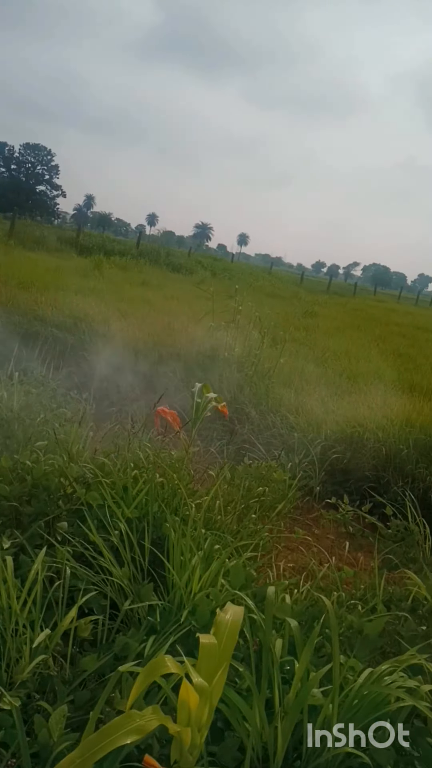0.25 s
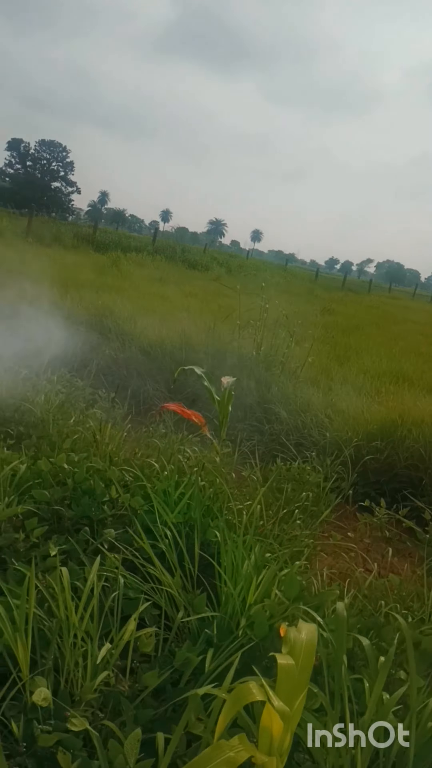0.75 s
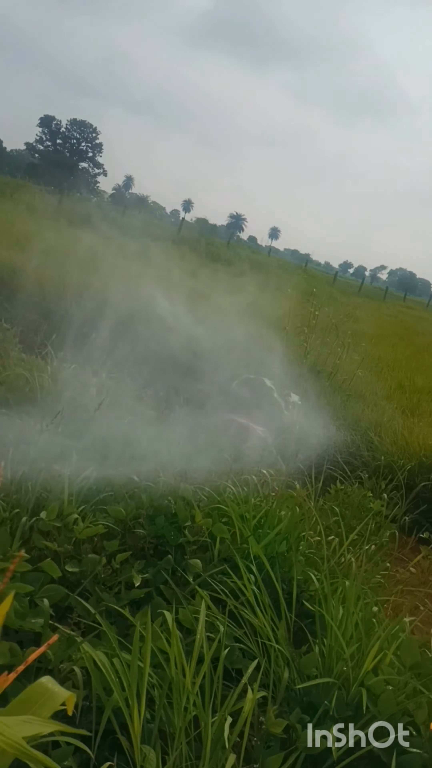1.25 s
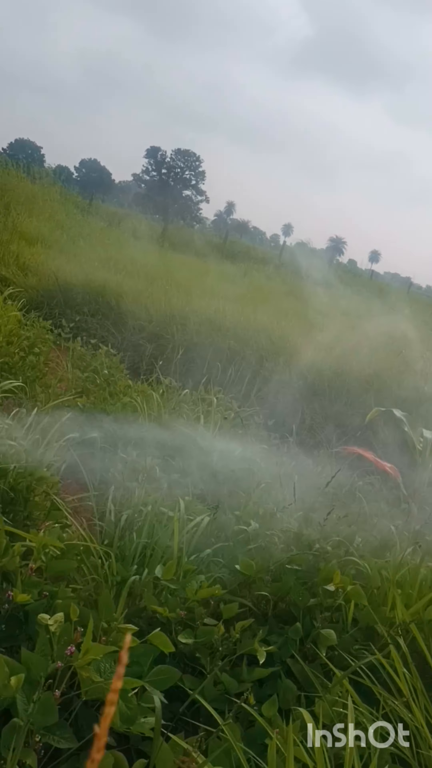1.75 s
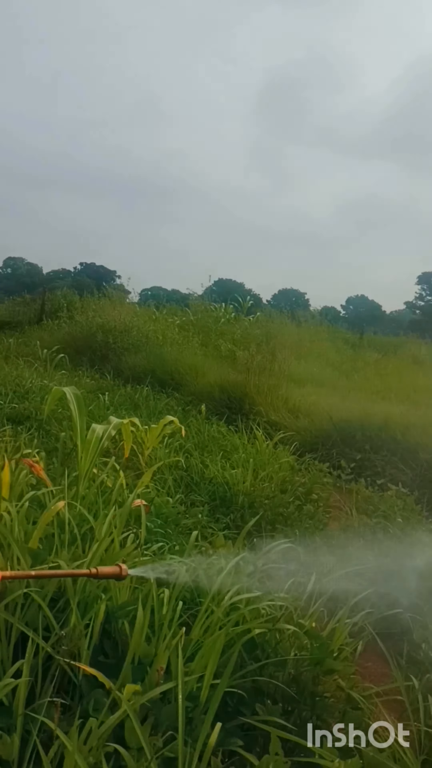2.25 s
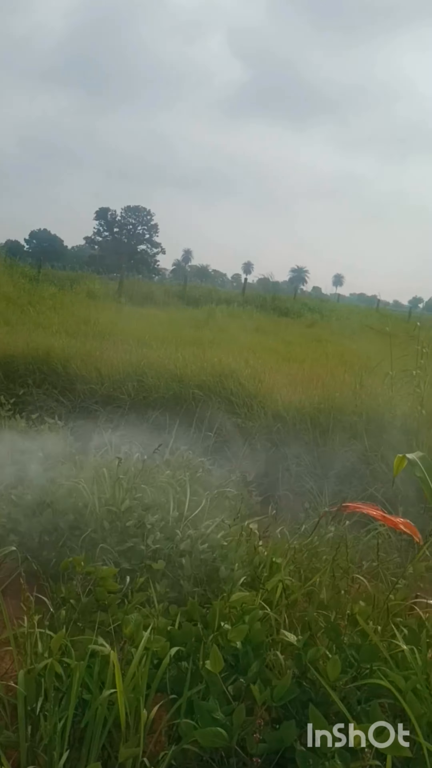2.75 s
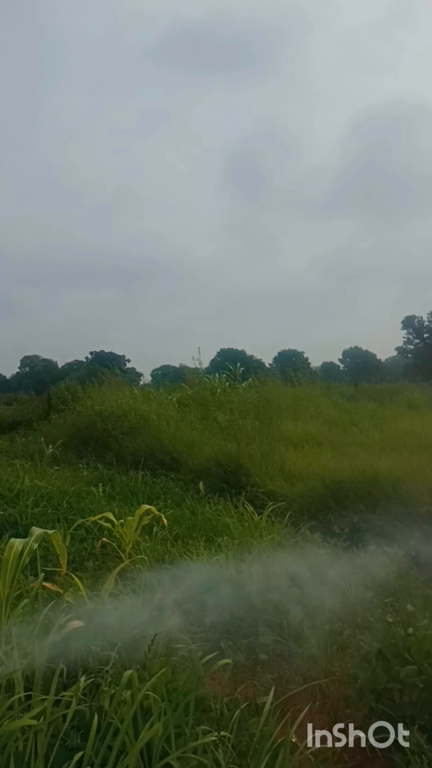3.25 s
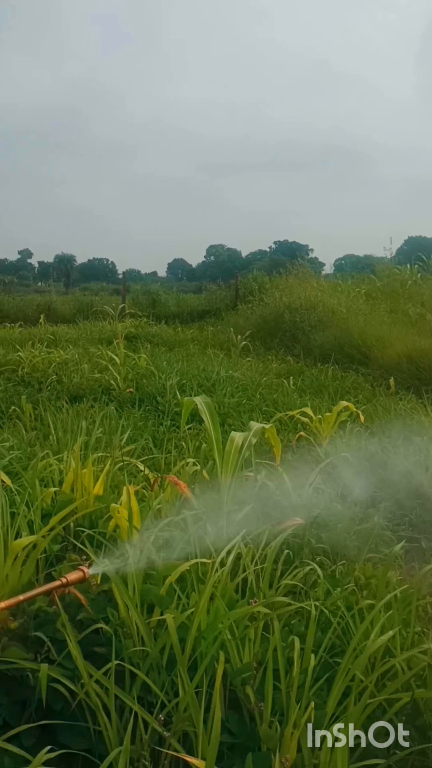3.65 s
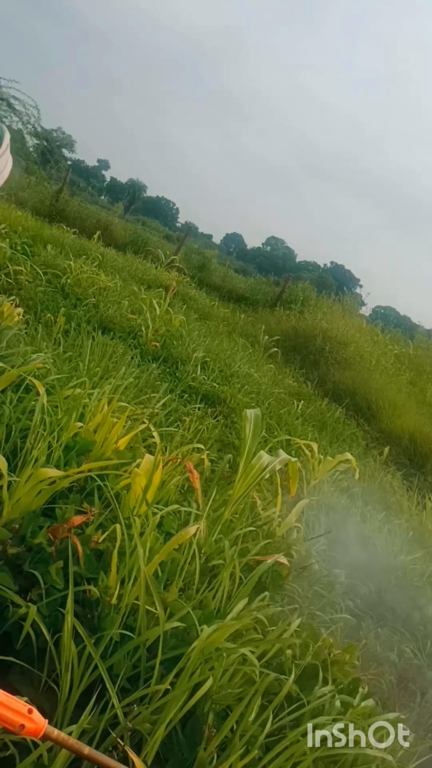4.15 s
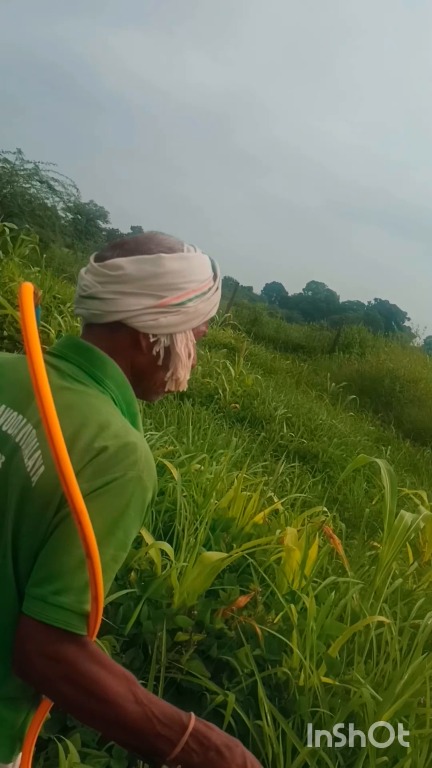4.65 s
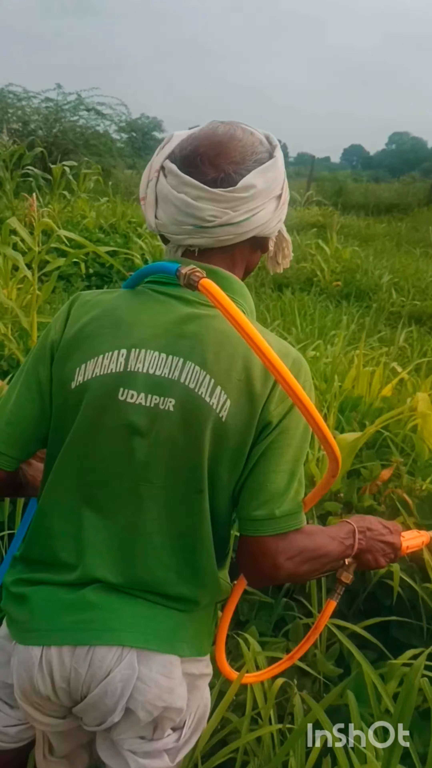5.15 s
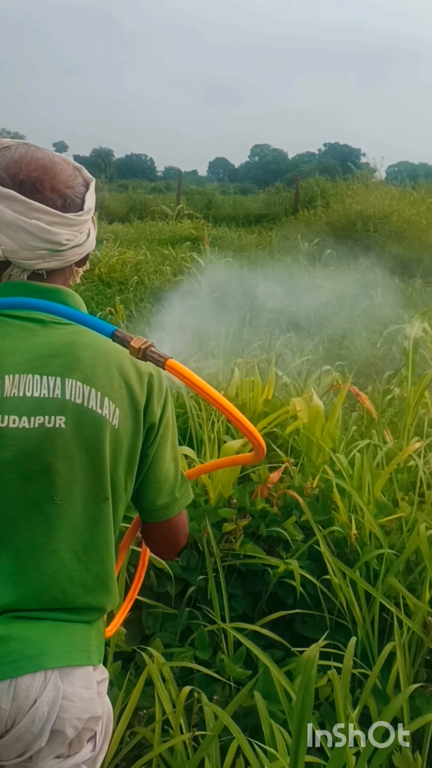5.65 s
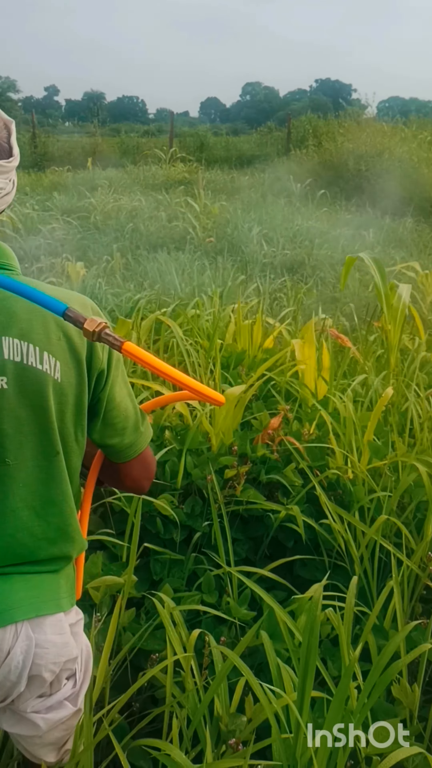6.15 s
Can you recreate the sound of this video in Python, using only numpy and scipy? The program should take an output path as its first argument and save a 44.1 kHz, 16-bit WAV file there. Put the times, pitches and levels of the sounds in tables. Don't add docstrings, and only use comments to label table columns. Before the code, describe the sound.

Bright, airy spray hiss with fine sizzling droplets over leaves, faint low engine drone behind, and a single loud thump on the microphone.

```python
import sys
import numpy as np
from scipy import signal
from scipy.fft import rfft, irfft, next_fast_len
from scipy.io import wavfile
from scipy.ndimage import uniform_filter1d, map_coordinates

SR = 44100
rng = np.random.default_rng(int(sys.argv[2]) if len(sys.argv) > 2 else 0)


def rack_gain(trim_db):
    fader = np.asarray(trim_db, float)
    return 10 ** (fader / 20)


def wav_record(signal):
    frames = np.transpose(np.atleast_2d(signal))
    bounded = np.clip(frames, -1, 1)
    quanta = np.round(bounded * 32767).astype(np.int16)
    wavfile.write(sys.argv[1], SR, quanta)


N = 282240


def unit(x):
    return x / np.sqrt(np.mean(x ** 2) + 1e-20)


def along(points, hz):
    f, v = np.transpose(points)
    return np.interp(np.log(hz + 1), np.log(f + 1), v)


def curves(rows):
    s, *columns = np.transpose(rows)
    return [np.interp(np.arange(N) / SR, s, column) for column in columns]


def wobble(rate):
    knots = rng.standard_normal(int(N * rate / SR) + 4)
    return map_coordinates(knots, [np.arange(N) * rate / SR])


def filtered(x, response):
    m = next_fast_len(N + 8192)
    return irfft(rfft(x, m) * response(np.fft.rfftfreq(m, 1 / SR)), m)[..., :N]


def below(hz, edge_hz, order=8):
    return 1 / (1 + (hz / edge_hz) ** order)


def shaped_noise(spectrum):
    return filtered(rng.standard_normal(N), lambda f: rack_gain(along(spectrum, f)))


def patchy(source, patchy_db, size):
    z = signal.stft(source, nperseg=512)[2]
    field = uniform_filter1d(rng.standard_normal(z.shape), size[0], 0)
    field = uniform_filter1d(field, size[1], 1)
    return signal.istft(z * rack_gain(patchy_db * unit(field)), nperseg=512)[1][:N]


def spray(crackle, streak_db):
    drops = (rng.random(N) < .01) * rng.standard_normal(N)
    noise = rng.standard_normal(N) + crackle * unit(drops)
    slow = patchy(noise, patchy_db=0.34, size=(3, 50))
    puffing = patchy(slow, patchy_db=1.0, size=(9, 4))
    return patchy(puffing, patchy_db=streak_db, size=(2, 5))


def splashes():
    # time_s, swell_db, length_s
    leaf_hits = [(1.24, 2.5, .02), (1.3, 3.5, 0.009), (1.477, 1.5, .012), (1.54, 2.5, .03),
                 (2.485, 4, .008), (2.576, 3, .008), (2.77, 5, 0.03), (3.023, 4, 0.012), (3.97, 3, 0.026),
                 (4.6, 1, .013), (5.175, 4, .0094), (5.186, 3.5, 0.011), (5.395, 9.5, .012),
                 (5.433, 2.5, 0.0074), (5.694, 4.5, 0.0049), (5.807, 7, 0.0044), (5.92, 4, .005),
                 (5.936, 8, .0045), (6.075, 6, .006), (6.212, 4.5, .0065)]
    t = np.arange(N) / SR
    return sum(db * np.exp(-.5 * ((t - s) / max(length, .002)) ** 2) for s, db, length in leaf_hits)


def shade():
    middle_s, takes_s = 4.14, 1.5
    return np.clip((np.arange(N) / SR - middle_s) / takes_s + .5, 0, 1)


def jet():
    borders = [2640, 4880, 6500, 10560]
    # freq_hz, density_db
    port_colour = [(200, -31), (400, -8), (900, -11), (1720, -10.5), (2800, -6.5), (4300, 0), (5300, 0.5),
                   (5900, -5.5), (7600, -14.5), (10000, -15), (11500, -5.5), (12500, -3.5), (13700, -5.5),
                   (15500, -11.5)]
    # time_s, nearness_db, nozzle_aim_db
    swings = [(0, -34, -1.5), (.4, -34.5, -3), (.93, -33, -5.5), (1.2, -31, -4), (1.68, -32.5, -7),
              (1.95, -32.5, -4.5), (2.33, -30.5, -6), (2.6, -32.5, -7.5), (2.98, -30, -4),
              (3.25, -32.5, -9), (3.7, -33, -9), (4.15, -29.5, -7), (4.5, -26.5, -5.5), (4.85, -28, -3),
              (5.25, -31, -2.5), (5.6, -35.5, -5), (6, -37.5, -7.5), (6.4, -36, -5.5)]
    usual_db, usual_aim_db = -31.5, -4.7
    near_db, aim_db = curves(swings)
    a, b, c, d = borders

    swell_db = splashes()
    bright_db = 0.32 * swell_db
    sputter_db = 0.41 * wobble(9) + .5 * wobble(20) + 0.38 * wobble(55)
    fizz_flicker_db, sizzle_flicker_db = .9 * wobble(70), .9 * wobble(70)

    def band(x, lo, hi):
        return unit(filtered(x, lambda f: (below(f, hi) - below(f, lo)) * rack_gain(along(port_colour, f))))

    def level_db(db, near, aim):
        return db + near * (near_db - usual_db) + aim * (aim_db - usual_aim_db)

    hiss_db = level_db(-37.5, 0.77, 0.78) + swell_db + 0.27 * sputter_db
    fizz_db = level_db(-34.5, 1, -0.24) + bright_db + fizz_flicker_db + 1.1 * sputter_db
    roar_db = level_db(-44.5, 0.64, -0.16) - 2.5 * shade() + 0.86 * (bright_db + sputter_db)
    patter_db = level_db(-39.5, 1.3, -0.37) + 0.5 * (swell_db + sputter_db)
    sizzle_db = level_db(-42, 1.22, -.5) + bright_db + sizzle_flicker_db + 0.18 * sputter_db

    nozzle, crop = spray(crackle=0.16, streak_db=2.5), spray(crackle=0.27, streak_db=1.5)
    from_nozzle = rack_gain(hiss_db) * band(nozzle, b, c) + rack_gain(fizz_db) * band(nozzle, d, SR)
    from_crop = rack_gain(roar_db) * band(crop, 1, a) + rack_gain(patter_db) * band(crop, a, b)
    return from_nozzle + from_crop + rack_gain(sizzle_db) * band(crop, c, d)


def reflected(x):
    # time_s, near_delay_ms, near_share (0-1), far_delay_ms, far_share (0-1)
    paths = [(0, .6, .25, 1.14, 0.38), (.8, 0.69, 0.2, 1.1, 0.04), (2, 0.61, .32, 1.1, 0.25),
             (2.7, 0.67, 0.24, 1.36, 0.03), (3.3, 0.63, 0.54, 1.13, 0.17), (4.4, 0.64, 0.31, 1.07, 0.36),
             (5.1, 0.56, 0.06, 1.31, 0.32), (5.7, 0.26, 0.15, 1.41, 0.3), (6.4, 0.17, 0.43, 1.4, 0.5)]
    near_ms, near, far_ms, far = curves(paths)
    dull = filtered(x, lambda f: below(f, 2520, order=4))

    def late(delay_ms):
        return map_coordinates(dull, [np.arange(N) - delay_ms * SR / 1000], order=3)

    return x + near * late(near_ms) + far * late(far_ms) - 0.1 * (near ** 2 + far ** 2) * dull


def evened(x, share):
    level = np.sqrt(np.abs(uniform_filter1d(x ** 2, 1200)) + 1e-12)
    return unit(x / level ** np.clip(share, 0, 1))


def wind():
    # time_s, level_db
    strength = [(0, -52), (.35, -46), (.7, -45.5), (.95, -52), (2.1, -52.5), (2.55, -48), (2.95, -53.5),
                (3.45, -47), (4.2, -51.5), (4.45, -49), (4.7, -49.5), (5.05, -48.5), (5.4, -51.5),
                (6.1, -49.5), (6.4, -53)]
    # freq_hz, density_db
    buffet_spectrum = [(20, -40), (33, -15), (50, -9), (80, -3.5), (140, -11), (220, -17.5), (400, -41),
                       (900, -90)]
    level_db = curves(strength)[0] + 1.8 * wobble(12)
    return rack_gain(level_db) * evened(shaped_noise(buffet_spectrum), share=0.22)


def engine():
    # time_s, level_db
    loudness = [(0, -52.5), (1.1, -53), (1.7, -48), (3.3, -47), (4.2, -54), (5, -49.5), (6.4, -52)]
    # freq_hz, density_db
    drone_spectrum = [(90, -60), (170, -3.5), (250, -1), (310, -1), (370, -8.5), (700, -36), (1500, -90)]
    level_db = curves(loudness)[0] - 0.87 + 1.26 * wobble(25)
    return rack_gain(level_db) * unit(shaped_noise(drone_spectrum))


def puffs():
    # start_s, end_s, level_db
    gusts = [
        (0.422, 0.525, -36),
        (0.531, 0.662, -37),
        (0.678, 0.722, -41),
        (5.195, 5.3, -45),
    ]
    # freq_hz, density_db
    puff_spectrum = [(20, -51), (40, -2), (75, 5), (120, 2), (170, -4.5), (270, -13), (450, -28),
                     (900, -90)]
    t, strength = np.arange(N) / SR, np.zeros(N)
    for start, end, db in gusts:
        strength += rack_gain(db) * np.clip(np.minimum(t - start, end - t) / 0.014 + .5, 0, 1)
    return strength * evened(shaped_noise(puff_spectrum), share=0.38)


def ticks():
    # time_s, level_db, pitch_hz
    touches = [(2.336, -33, 600), (2.73, -31, 800), (3.177, -25, 754), (4.484, -36, 603)]
    out, t = np.zeros(N + SR), np.arange(SR // 8) / SR
    for s, db, hz in touches:
        cycles = hz * (t - .005)
        tick = np.exp(-(cycles / .46) ** 2) * np.cos(2 * np.pi * cycles)
        out[round((s - .005) * SR):][:len(t)] += rack_gain(db) * tick
    return out[:N]


def knocks():
    # time_s, thump_db, thump_hz, ring_db, polarity (sign)
    blows = [
        (2.344, -36, 70, -60, 1),
        (2.454, -34, 111, -55, 1),
        (3.4359, -2.7, 138.2, -14, -1),
        (3.4505, -21, 77.5, -70, 1),
        (3.478, -22, 85, -62, 1),
        (3.51, -38, 80, -60, 1),
        (4.491, -35, 89, -60, 1),
        (4.947, -26.5, 100, -39, -1),
        (5.022, -46, 150, -33, -1),
        (5.186, -27.5, 110, -58, -1),
    ]
    # freq_hz, level_db, t60_s
    modes = [(242, -.3, .041), (321, -3.1, .043), (362, 4, .025), (520, -7, .025), (680, -10, .015)]
    out, t = np.zeros(N + SR), np.arange(SR // 8) / SR
    ring = sum(rack_gain(db - 60 * t / t60) * np.sin(2 * np.pi * hz * t) for hz, db, t60 in modes) * t / .004
    push = 1.05 * (t / .00062 * np.exp(1 - t / .00062)) ** 2
    rough_phase = 1.5 * rng.standard_normal(len(t)).cumsum() / 4
    snap = rack_gain(-8 - 60 * t / .008) * np.sin(2 * np.pi * 3100 * t + rough_phase)
    contact = ring + push + snap
    rise_s = .0094
    sag_s = 4.19 * rise_s
    swell = (t / rise_s * np.exp(1 - t / rise_s)) ** 3
    for s, db, hz, ring_db, sign in blows:
        thump = swell * np.sin(2 * np.pi * hz * sag_s * np.arctan(t / sag_s))
        out[round(s * SR):][:len(t)] += np.sign(sign) * rack_gain(db) * thump
        out[round((s + .0014) * SR):][:len(t)] += np.sign(sign) * rack_gain(ring_db) * contact
    return out[:N]


def scene():
    mono = reflected(jet()) + wind() + engine() + puffs() + ticks() + knocks()
    return np.array([mono, mono])


def parting():
    return [(.11, 5200), (.11, 13400), (3.25, 7600), (3.296, 11000), (3.458, 6300), (3.48, 13100),
            (3.83, 8300), (3.83, 11700), (4.48, 5100), (4.48, 9700), (5.5, 10700), (5.5, 13800)]


def band_limit(x):
    return signal.sosfilt(signal.butter(12, 16710, fs=SR, output="sos"), x)


def record(dry):
    t, side = np.arange(N) / SR, np.zeros(N)
    earlier = np.roll(dry[0], 4096)
    for s, hz in parting():
        window = np.cos(np.pi * np.clip((t - s) * SR / 2000, -.5, .5)) ** 2
        side += window * filtered(earlier, lambda f: np.abs(f - hz) < 1700 / 2)
    parted = dry + rack_gain(-2.0) * side * [[1], [-1]]
    mix = filtered(parted, lambda f: (f < 15500) * (1 - below(f, 35, order=5)))
    return band_limit(mix)


dry = scene()
out = record(dry)
wav_record(out)
```